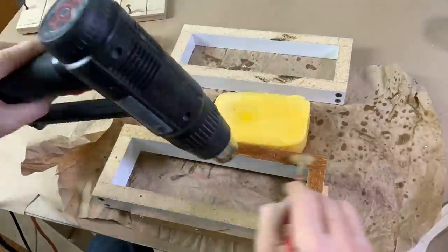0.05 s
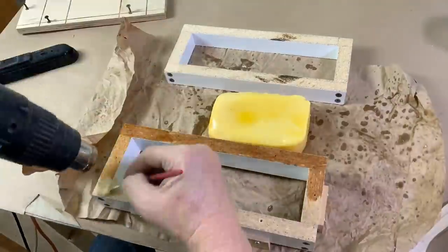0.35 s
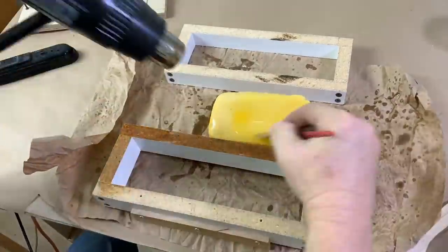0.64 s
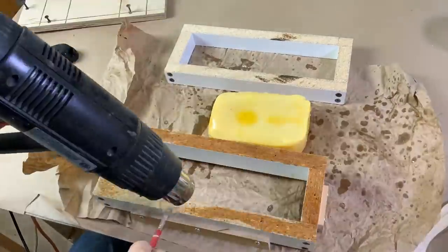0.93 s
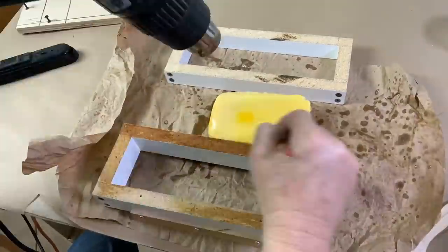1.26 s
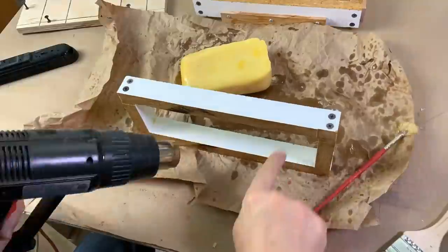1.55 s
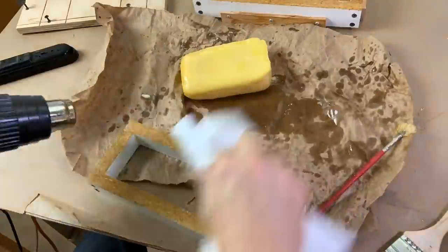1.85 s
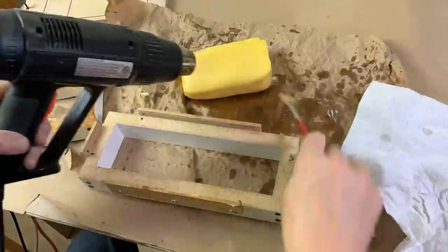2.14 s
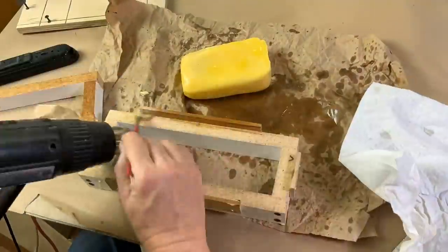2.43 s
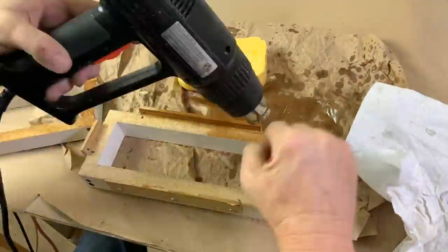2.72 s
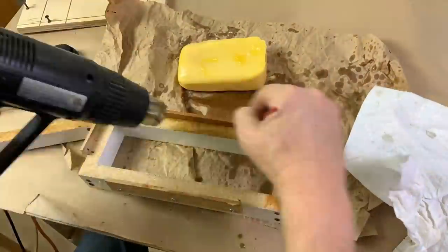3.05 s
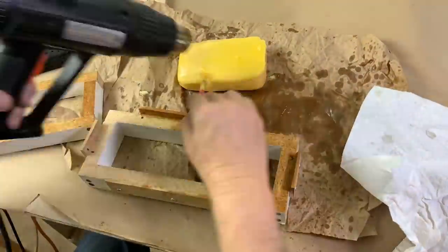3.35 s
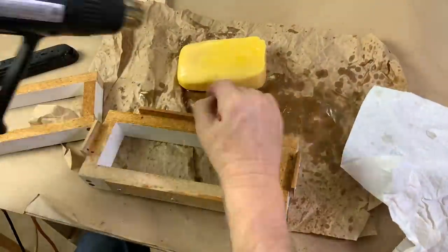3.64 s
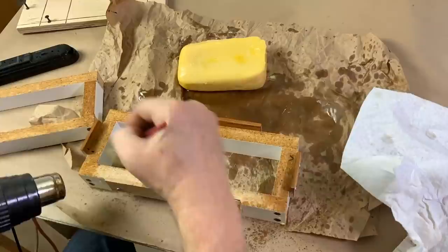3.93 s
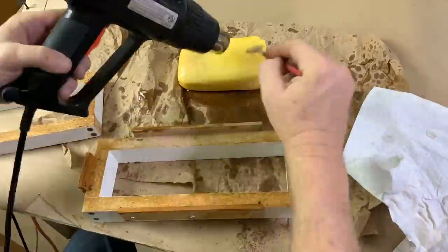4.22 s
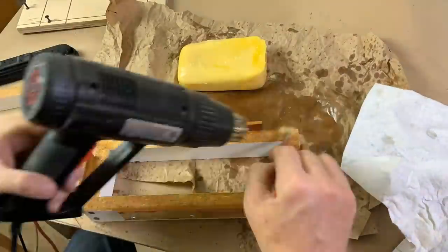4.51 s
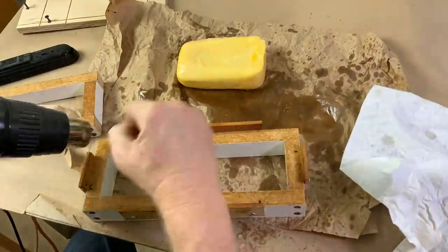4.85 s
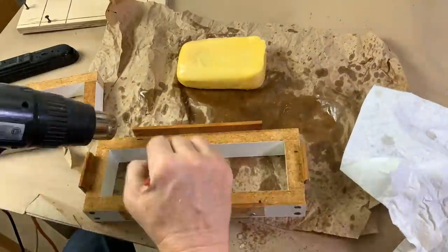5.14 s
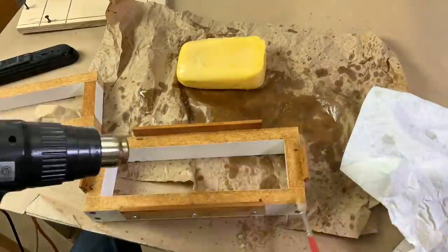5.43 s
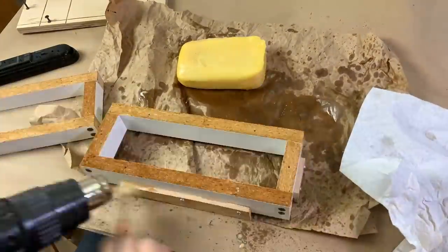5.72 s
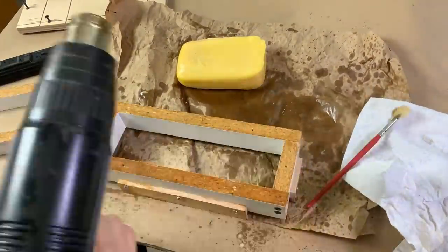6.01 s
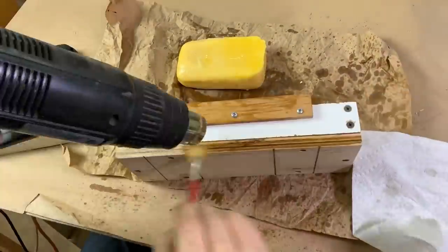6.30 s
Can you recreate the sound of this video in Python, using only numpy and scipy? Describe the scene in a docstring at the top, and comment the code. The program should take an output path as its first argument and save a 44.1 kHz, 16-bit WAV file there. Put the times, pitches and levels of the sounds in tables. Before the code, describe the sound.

Close by, a heat gun blows continuously over wooden frames on a workbench. A hollow rush of air and a bright hiss carry the sound, with a soft motor hum and wavering whine inside them. The pitch holds nearly constant, while the tone shifts gently as the gun turns and the air passes over the wood. Faint whistles come and go, and it is still running at the end.

```python
"""An electric heat gun runs steadily as a hand sweeps it over wooden frames on a workbench.
Its fan roars through the barrel, air rushes into the intake, and the nozzle hisses.
The motor hums and whines at whole multiples of its turning speed, called shaft orders.
Passes of the air jet over the wood lift the hiss and usually the rumble. The fan's tones
swell and fade as the gun turns, and air whistles briefly where it catches an edge."""
import sys
import numpy as np
from scipy import signal
from scipy.fft import rfft, irfft, next_fast_len
from scipy.io import wavfile
from scipy.ndimage import uniform_filter1d, map_coordinates

SR = 44100
rng = np.random.default_rng(int(sys.argv[2]) if len(sys.argv) > 2 else 0)


def unload_wav(signal):
    """Save mono or channel-first audio to the path in sys.argv[1] as 16-bit WAV at rate SR, clipped to [-1, 1]."""
    wavfile.write(
        sys.argv[1],
        SR,
        np.round(np.clip(np.atleast_2d(signal).T, -1, 1) * 32767).astype(np.int16),
    )


N = 285411

# The motor creeps up in speed. Each row: time in seconds, shaft turns per second.
SHAFT_SPEED = [(0.0, 252.5), (0.24, 251.6), (0.38, 252.5), (0.58, 251.8), (0.77, 252.8), (0.97, 252),
               (1.18, 253), (1.35, 252.1), (1.46, 252.5), (1.57, 253.9), (1.85, 254.4), (2.2, 254),
               (2.55, 254.9), (2.95, 254.1), (3.2, 254.6), (3.44, 254), (3.66, 255.1), (3.89, 254.1),
               (4.1, 255.2), (4.5, 255.1), (4.85, 254.6), (5.17, 255.4), (5.52, 254.5), (5.77, 255.7),
               (6.0, 254.9), (6.2, 255.5), (6.47, 255.5)]
# The jet passes over the wood.
# Each row: middle in seconds, length in seconds, change of the hiss in dB, change of the rumble in dB.
JET_PASSES = [(0.052, 0.22, 3, 9.5), (0.453, 0.3, 2, -6), (0.85, 0.19, 4.5, 11), (1.203, 0.28, 4.5, 10.5),
              (1.9, 0.376, 2.5, 3), (2.64, 0.33, 2.5, 1), (3.309, 0.15, 1.5, 3), (3.759, 0.2, 2.5, 9),
              (4.25, 0.35, 2.5, 6), (4.579, 0.34, 1.5, 1), (5.24, 0.2, 1, 3), (5.882, 0.27, 2.5, 3),
              (6.34, 0.38, 2, 5)]


def amp(db):
    """Turn decibels (dB) into a factor to multiply a sound by."""
    return 10 ** (np.asarray(db) / 20)


def unit(x):
    """Scale a signal so that its average strength (rms) is 1."""
    return x / np.sqrt(np.mean(np.abs(x) ** 2) + 1e-20)


def level_at(spectrum, hz):
    """Read a level between rows of pitch and level, on a scale with evenly spaced octaves."""
    pitches, levels = np.transpose(spectrum)
    return np.interp(np.log(hz + 1), np.log(pitches + 1), levels)


def curve(rows):
    """Join rows of time and value with straight lines, giving one value per sample."""
    times, values = np.transpose(rows)
    return np.interp(np.arange(N) / SR, times, values)


def swells(rows):
    """Add up smooth bumps. Each row: middle in seconds, length in seconds at half height, height."""
    t = np.arange(N) / SR
    return sum(height * np.cos(np.pi / 2 * np.clip((t - middle) / length, -1, 1)) ** 2
               for middle, length, height in rows)


def wobble(rate, size=2048):
    """A smooth random curve of strength 1 that finds a new value `rate` times a second."""
    positions = np.linspace(0, rate * N / SR, size)
    coarse = map_coordinates(rng.standard_normal(size), [positions], mode="wrap")
    return unit(np.interp(np.linspace(0, size - 1, N), np.arange(size), coarse))


def filtered(x, response):
    """Turn each frequency of a sound up or down by the factor response(hz)."""
    size = next_fast_len(N + SR // 2)
    hz = np.fft.rfftfreq(size, 1 / SR)
    return irfft(rfft(x, size) * response(hz), size)[:N]


def rush(spectrum, patchy_db, size=1024):
    """Swirling air: noise of strength 1, shaped by a spectrum, whose colour drifts in patches."""
    slices = signal.stft(rng.standard_normal(N), nperseg=size)[2]
    patches = uniform_filter1d(rng.standard_normal(slices.shape), size=10, axis=0)  # smooth over pitch
    patches = uniform_filter1d(patches, size=20, axis=1)  # and over time
    noise = signal.istft(slices * amp(patchy_db * unit(patches)), nperseg=size)[1][:N]
    return unit(filtered(noise, lambda hz: amp(level_at(spectrum, hz))))


def wandering_band(centre_hz, width_hz):
    """A narrow band of noise, of strength 1, that follows a moving pitch."""
    a, b = (filtered(rng.standard_normal(N), lambda hz: 1 / (1 + (hz / width_hz) ** 4))
            for _ in range(2))
    phase = 2 * np.pi * np.cumsum(centre_hz) / SR
    return unit(a * np.cos(phase) + b * np.sin(phase))  # shifts the two low noises up to the pitch


def shaft_angle(drift_hz, flutter_hz):
    """How far the shaft has turned, in radians; its speed drifts and flutters in the bearings."""
    speed_hz = curve(SHAFT_SPEED) + drift_hz * wobble(18) + flutter_hz * wobble(70)
    return 2 * np.pi * np.cumsum(speed_hz) / SR


def shaft_tone(angle, order, rough):
    """A tone at `order` times the shaft speed, its strength slightly shaken by the air."""
    shake = 1 + rough * wobble(35)
    return shake * unit(np.cos(order * angle + rng.uniform(0, 2 * np.pi)))


def mains_hum(hz, db):
    """A faint, steady hum at twice the frequency of the mains power."""
    return amp(db) * unit(np.sin(2 * np.pi * hz * np.arange(N) / SR))


def jet_rumble(rest_db):
    """The jet rumbles softly where it meets the wood."""
    # The rumble's colour. Each row: pitch in Hz, relative level in dB.
    spectrum = [(10, -40), (28, -35), (50, -12), (74, -6.5), (105, -2.5), (140, -0.5), (200, -2.5),
                (300, -1.5), (600, -22), (2000, -60)]
    change_db = swells([(middle, length, rumble) for middle, length, _, rumble in JET_PASSES])
    return amp(rest_db + change_db) * rush(spectrum, patchy_db=0.7)


def stray_whistles(count, mean_db, spread_db):
    """Rows for edge_whistles: faint, short whistles at the motor slots, at random times and pitches."""
    low_hz, high_hz, width_hz, length_s = 9850, 12760, 42, 0.081
    return [(when * N / SR, low_hz + pitch * (high_hz - low_hz), width_hz, length_s,
             mean_db + spread_db * (2 * strength - 1))
            for when, pitch, strength in rng.random((count, 3))]


def edge_whistles(rough_width_hz):
    """Air catches an edge and whistles (a narrow band) or, when it swirls more, hisses (a wide one)."""
    # Each row: middle in seconds, pitch in Hz, width in Hz, length in seconds, level in dB.
    edge_tones = [(.08, 4240, 450, 0.17, -49), (.08, 5760, 500, 0.14, -49.5),
                  (0.85, 4400, 900, 0.11, -49.5), (0.871, 5800, 400, 0.12, -52),
                  (1.296, 5870, 600, 0.11, -51), (1.17, 8600, 600, 0.17, -53), (1.47, 8300, 500, 0.1, -56),
                  (1.77, 7200, 400, 0.17, -51), (2.5, 5540, 500, 0.18, -59), (3.75, 5300, 700, 0.18, -63),
                  (4.97, 5106, 200, 0.43, -52.5), (5.0, 7200, 300, 0.49, -59), (.13, 11330, 50, .09, -57),
                  (.45, 11380, 50, .08, -56), (.77, 10900, 60, 0.075, -52), (.88, 11300, 50, .08, -61),
                  (.94, 11000, 50, .08, -59), (1.18, 11400, 50, .07, -56), (1.24, 10600, 70, 0.172, -53),
                  (4.47, 11000, 50, 0.17, -56), (5.68, 12050, 50, 0.16, -59)]
    strays = stray_whistles(count=30, mean_db=-68, spread_db=7)
    t = np.arange(N) / SR
    whistles = np.zeros(N)
    for middle, hz, width, length, db in edge_tones + strays:
        span = np.abs(t - middle) < length
        swell = np.cos(np.pi / 2 * (t[span] - middle) / length) ** 2
        size = next_fast_len(len(swell))
        offset_hz = np.fft.rfftfreq(size, 1 / SR) - hz
        band_shape = np.exp(-(offset_hz / width) ** 2)
        band = unit(irfft(rfft(rng.standard_normal(size)) * band_shape, size))
        # Narrow bands are evened out the most, so they hold steady like a true whistle.
        strength = np.abs(signal.hilbert(band))
        band = band / (strength + width / rough_width_hz)
        whistles[span] += amp(db) * swell * unit(band[:len(swell)])
    return whistles


def brush_whine(angle, fade_db, full_fade_hz):
    """The motor's brushes buzz on high shaft orders; shifting reflections fade each on its own."""
    # The buzz of the brushes on their contacts. Each row: pitch in Hz, relative level of a tone in dB.
    spectrum = [(3300, 1), (3850, 7.5), (4100, -8), (4600, -3), (5200, 5), (5900, 6.5), (6150, 3),
                (6700, 0), (7400, 5.5), (7650, 2.5), (7900, -2), (8400, -1.5), (8900, 1), (9400, 0),
                (10200, 1), (10900, 0.5), (11700, -2), (12150, 0.5), (12900, -6), (13500, -6), (14250, -7),
                (14650, -6), (15100, -15), (15800, -15)]
    shaft_hz = np.mean(np.transpose(SHAFT_SPEED)[1])
    whine = np.zeros(N)
    for order in range(13, 63):
        hz = order * shaft_hz
        depth_db = fade_db * min(hz / full_fade_hz, 1)  # high tones fade deepest
        fading = unit(amp(depth_db * np.tanh(wobble(14))))
        tone = np.cos(order * angle + rng.uniform(0, 2 * np.pi))
        whine += amp(level_at(spectrum, hz)) * fading * tone
    return unit(whine)


def vent_fizz(angle):
    """Cooling air fizzes through the motor slots, pulsing once a turn."""
    # The fizz's colour. Each row: pitch in Hz, relative level in dB.
    spectrum = [(4000, -31), (6500, -1), (7500, -1), (7950, 3), (8900, 5.5), (9600, 3), (11000, 2.5),
                (12100, -6), (12900, -11), (14600, -10), (15800, -20)]
    return rush(spectrum, patchy_db=1.7) * (1 + 0.19 * np.cos(angle))


def slot_treble(angle, beam_above_hz):
    """Whine and fizz leave the motor slots; their highest part forms a beam, so the aim matters."""
    # The level that whine and fizz both follow. Each row: time in seconds, base level in dB.
    levels = [(0, -51), (0.08, -49), (0.22, -53.5), (0.4, -52), (0.66, -53.5), (0.8, -48), (0.99, -53),
              (1.15, -51), (1.4, -52), (1.52, -51), (1.6, -53.5), (1.76, -51.5), (2.05, -51.5), (2.27, -56),
              (2.47, -51), (2.74, -51.5), (2.87, -53.5), (3.5, -55), (3.68, -52.5), (3.95, -54.5),
              (4.1, -53), (4.8, -54), (5.15, -53.5), (5.35, -55), (5.65, -53.5), (6.05, -53.5),
              (6.25, -50.5), (6.47, -51.5)]
    # The gun is held at new angles. Each row: time in seconds, change of the highest treble in dB.
    aim = [(0, 0), (1.5, -1), (1.62, 4), (2.8, 1), (3.5, -1), (4.6, 3.5), (6.47, 0)]
    base_db = curve(levels) + 0.8 * wobble(24)
    whine = amp(base_db + 1.5) * brush_whine(angle, fade_db=8, full_fade_hz=11000)
    fizz = amp(base_db - 3.5) * vent_fizz(angle)
    treble = whine + fizz
    beam = filtered(treble, lambda hz: 1 - 1 / (1 + (hz / beam_above_hz) ** 20))
    return treble + (amp(curve(aim)) - 1) * beam


def motor_hum(angle):
    """The slightly unbalanced motor shakes once a turn: a hum, with a wavering tone an octave above."""
    # How loud the hum and its octave are. Each row: time in seconds, level in dB.
    hum_levels = [(0.03, -64), (0.38, -50.5), (0.55, -55.5), (0.72, -53), (0.8, -62), (0.92, -62),
                  (1.02, -52.5), (1.22, -57.5), (1.5, -54), (1.64, -51.5), (1.88, -47.5), (2.25, -53.5),
                  (2.66, -48.5), (2.95, -52.5), (3.35, -50.5), (3.55, -56.5), (3.68, -52.8), (3.82, -55),
                  (4.55, -49), (6.15, -52.5), (6.42, -46)]
    octave_levels = [(0.03, -60), (0.16, -52), (0.6, -58.5), (0.85, -52), (1.05, -57), (1.7, -53),
                     (2.05, -48.5), (2.3, -60), (2.7, -51), (3.05, -58), (3.5, -58), (3.85, -53),
                     (4.3, -61), (4.67, -49), (5.1, -55.5), (5.4, -49), (5.72, -48), (5.9, -57),
                     (6.15, -58), (6.47, -54.5)]
    hum = amp(curve(hum_levels)) * shaft_tone(angle, order=1, rough=0.043)
    octave_db = curve(octave_levels) + 0.71 * wobble(9.8)
    return hum + amp(octave_db) * shaft_tone(angle, order=2, rough=0.06)


def motor_singing(angle, fan_order, fan_rest_db):
    """Single tones sing out as their beams sweep past the listener; the fan's whistle never stops."""
    # The sung notes. Each row: middle in seconds, shaft order, length in seconds, level in dB.
    notes = [(0.042, 12, 0.2, -53), (0.66, 12, 0.13, -58), (0.84, 12, 0.22, -54), (1.23, 12, 0.21, -52),
             (1.45, 12, 0.085, -63), (1.71, 12, 0.094, -57), (1.9, 12, 0.21, -57), (2.52, 12, 0.18, -52.5),
             (3.76, 12, 0.28, -63), (5.2, 12, 0.18, -59), (4.486, 12, 0.26, -59), (3.8, 12, 0.1, -64),
             (5.26, 12, 0.11, -57.5), (6.097, 12, 0.24, -61), (5.8, 12, 0.11, -52.5),
             (5.022, 17, 0.16, -59), (3.78, 23, 0.12, -53), (5.05, 23, 0.17, -57), (0.071, 30, 0.18, -52),
             (0.55, 30, 0.12, -60), (0.81, 30, 0.2, -54.5), (1.15, 30, 0.37, -58.5), (2.26, 32, 0.2, -63),
             (0.36, 35, 0.2, -55), (1.03, 35, 0.086, -56), (1.4, 35, 0.12, -57), (3.43, 35, 0.3, -63),
             (3.7, 35, 0.14, -53), (0.38, 38, 0.16, -56), (4.07, 47, 0.1, -56), (3.15, 48, 0.35, -62),
             (4.9, 48, 0.3, -62), (0.6, 58, 0.3, -64)]
    song = np.zeros(N)
    for order in sorted({row[1] for row in notes}):
        gain = swells([(middle, length, amp(db))
                       for middle, note_order, length, db in notes if note_order == order])
        rest = amp(fan_rest_db) if order == fan_order else 0
        song += (rest + gain) * shaft_tone(angle, order, rough=0.18)
    return song


def fan_tones(angle, waver_db):
    """The fan's two tones waver, swelling as it faces the listener and fading as it turns away."""
    # The lower and the upper tone. Each row: shaft order, resting level in dB.
    tones = [(5, -52), (6, -55)]
    # The hand turns the gun. Each row: middle in seconds, length in seconds,
    # change of the lower tone in dB, change of the upper tone in dB.
    turns = [(0.05, 0.1, -3, -3), (0.267, 0.15, 2.5, 6), (0.453, 0.087, 6.5, 1), (0.615, 0.07, 5, 10),
             (0.805, 0.052, 2, 5), (0.996, 0.084, 1, 10), (1.204, 0.06, 6, 4), (1.393, 0.07, 4, 12),
             (1.631, 0.11, 9, 2), (1.9, 0.15, -1, 7), (2.15, 0.08, 1, -1), (2.397, 0.14, 5.5, 5),
             (2.657, 0.11, 0, 7), (2.775, 0.08, -7, 3), (3.195, 0.28, 8, 4), (3.498, 0.27, 2, -11),
             (3.76, 0.06, -5, -1), (3.91, 0.113, 8.5, 8), (4.17, 0.072, 0, 7), (4.33, 0.12, -11, 2),
             (4.705, 0.28, 3.5, 3), (4.98, 0.46, 4, 2), (5.52, 0.27, 11, 8.5), (6.042, 0.11, 10, 10),
             (6.37, 0.16, 6, 12)]
    fan = np.zeros(N)
    for k, (order, rest_db) in enumerate(tones):
        change_db = swells([(middle, length, changes[k]) for middle, length, *changes in turns])
        tone = shaft_tone(angle, order, rough=0.07)
        fan += amp(rest_db + change_db + waver_db * wobble(9.8)) * tone
    return fan


def frame_hollow(rest_db):
    """The jet sounds the hollow of a wooden frame, louder when it blows into it."""
    # The hollow's colour. Each row: pitch in Hz, relative level in dB.
    spectrum = [(700, -32.5), (900, -7), (1020, 0), (1130, -3), (1250, -6), (1420, -8), (2000, -54)]
    # The jet blows into a frame. Each row: middle in seconds, length in seconds, level in dB.
    blows = [(0.044, 0.22, -40), (0.875, 0.13, -39), (1.23, 0.22, -43.5), (2.37, 0.12, -44),
             (3.2, 0.42, -52), (4.95, 0.46, -43.5), (5.62, 0.27, -44), (6.38, 0.47, -47)]
    blown = swells([(middle, length, amp(db)) for middle, length, db in blows])
    return np.hypot(amp(rest_db), blown) * rush(spectrum, patchy_db=1.2)


def nozzle_hiss(rest_db):
    """Air rings in the nozzle and hisses out of it; the hiss rises with each pass over the wood."""
    # The colours of the nozzle's lowest ring and its hiss. Each row: pitch in Hz, relative level in dB.
    ring_spectrum = [(1900, -42), (2200, -5.5), (2380, 1), (2560, 5), (2720, -5.5), (2950, -7.5),
                     (3400, -25)]
    hiss_spectrum = [(1200, -17), (2600, -1.5), (3000, 2), (3300, -1.5), (3650, 2), (3900, 0.5), (4250, 0),
                     (4700, -4.5), (5300, -2.5), (5800, -4), (6200, -8.5), (6650, -8.5), (7150, -5.5),
                     (7800, -13), (14000, -36)]
    # How loud the ring is. Each row: time in seconds, level in dB.
    ring_levels = [(0.0, -52), (0.25, -51), (0.4, -46), (0.55, -52), (0.73, -49.5), (0.83, -49),
                   (1.01, -54), (1.2, -43), (1.36, -53.5), (1.7, -50), (1.98, -45.5), (2.28, -50),
                   (2.7, -44), (3.1, -51.5), (3.32, -49), (3.46, -52.5), (3.98, -51.5), (4.15, -48),
                   (4.65, -49), (4.96, -55), (5.2, -48), (5.55, -52.5), (5.8, -47), (6.05, -52),
                   (6.27, -42.5), (6.47, -46.5)]
    ring = amp(curve(ring_levels)) * rush(ring_spectrum, patchy_db=2.5)
    rise_db = swells([(middle, length, hiss) for middle, length, hiss, _ in JET_PASSES])
    return ring + amp(rest_db + rise_db) * rush(hiss_spectrum, patchy_db=1.2)


def intake_rush():
    """Air rushes into the intake, which rings at a pitch that shifts as the gun nears the wood."""
    # The colour of the rush. Each row: pitch in Hz, relative level in dB.
    spectrum = [(700, -44), (1250, -20), (1450, -5), (1620, -3), (1790, -1), (2060, -5), (2270, -4),
                (2520, -21), (2800, -18), (3300, -44), (5000, -33)]
    # The intake's moving ring. Each row: time in seconds, pitch in Hz.
    ring_pitches = [(0, 1820), (0.25, 1970), (0.52, 2040), (0.8, 1876), (1.15, 1820), (1.45, 1950),
                    (1.78, 1808), (2.03, 2100), (2.15, 1830), (2.35, 1920), (2.55, 1810), (2.68, 1904),
                    (2.8, 1810), (3.1, 1980), (3.45, 1770), (3.9, 2000), (4.1, 1850), (4.62, 1810),
                    (4.87, 1980), (5.35, 1780), (5.6, 1950), (5.88, 1800), (6.1, 2090), (6.25, 1890),
                    (6.47, 1970)]
    # The level that rush and ring both follow. Each row: time in seconds, base level in dB.
    levels = [(0.0, -42), (0.08, -42), (0.35, -47.5), (0.52, -42.5), (0.65, -44), (0.82, -40),
              (0.96, -43.5), (1.05, -40.5), (1.25, -42), (1.52, -41.5), (1.62, -45.5), (1.78, -40.5),
              (2.0, -42.5), (2.23, -47), (2.43, -46.5), (2.52, -42), (2.93, -45.5), (3.22, -43.5),
              (3.45, -46), (3.8, -42), (3.96, -47.5), (4.1, -42.5), (4.6, -42), (4.72, -44), (4.85, -41.5),
              (5.05, -44), (5.3, -44), (5.45, -46), (5.68, -43), (5.92, -42), (6.15, -44), (6.47, -42)]
    ring = wandering_band(curve(ring_pitches), width_hz=180)
    air = amp(-0.5) * rush(spectrum, patchy_db=2.5)
    return amp(curve(levels)) * (air + ring)


def barrel_roar():
    """The fan roars through the barrel, which strengthens some pitches more than others."""
    # The barrel's colour. Each row: pitch in Hz, relative level in dB.
    spectrum = [(100, -35.5), (225, -19.5), (290, -20), (325, -9), (365, -16), (440, -10.5), (520, -7.5),
                (630, -6.5), (730, 1), (790, -1), (900, -7), (1060, -11), (1330, -24), (2400, -42)]
    # How loud the roar is as the hand moves the gun. Each row: time in seconds, level in dB.
    levels = [(0.0, -42), (0.2, -42.5), (0.42, -39), (0.62, -40.5), (0.76, -39), (0.95, -41), (1.18, -39.5),
              (1.5, -39.5), (1.85, -38.7), (2.35, -39), (2.66, -38), (2.98, -42), (3.3, -39), (3.38, -40),
              (3.47, -44.5), (3.58, -40.5), (3.72, -40.3), (4.06, -39.5), (4.19, -37.5), (5.0, -39),
              (5.6, -39), (5.9, -37), (6.15, -39.5), (6.45, -35.5)]
    roar_db = curve(levels) + 0.07 * wobble(13)
    return amp(roar_db) * rush(spectrum, patchy_db=0.64)


def with_bench_echo(x, delay_s, sway, share):
    """The bench adds a weak echo whose delay wanders with the height of the gun."""
    samples = np.arange(N)
    lag = SR * delay_s * np.exp(sway * wobble(2.5))
    echo = np.interp(samples - lag, samples, x)
    return (x + share * echo) / np.hypot(1, share)


def scene():
    """The whole heat gun, the same in both channels; one shaft drives motor and fan."""
    angle = shaft_angle(drift_hz=0.1615, flutter_hz=0.26)
    treble = slot_treble(angle, beam_above_hz=11900)
    motor = motor_hum(angle) + motor_singing(angle, fan_order=12, fan_rest_db=-60)
    fan = fan_tones(angle, waver_db=1.5)
    whistles = edge_whistles(rough_width_hz=140)
    air = barrel_roar() + intake_rush() + nozzle_hiss(rest_db=-48) + frame_hollow(rest_db=-48.5)
    air = with_bench_echo(air, delay_s=0.001267, sway=0.251, share=0.1)
    background = mains_hum(hz=120.3, db=-72.5) + jet_rumble(rest_db=-64.5)
    gun = background + whistles + treble + motor + fan + air
    return np.array([gun, gun])


def record(dry):
    """Cut away the very highest treble."""
    top_hz = 15720
    return np.array([filtered(channel, lambda hz: hz < top_hz) for channel in dry])


dry = scene()
out = record(dry)
unload_wav(out)
```